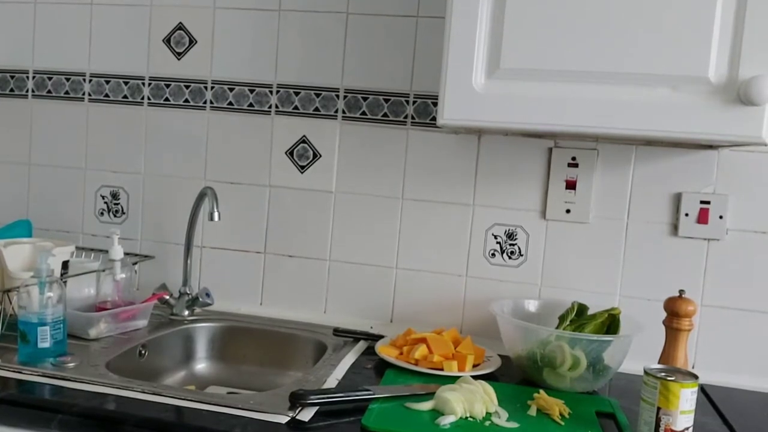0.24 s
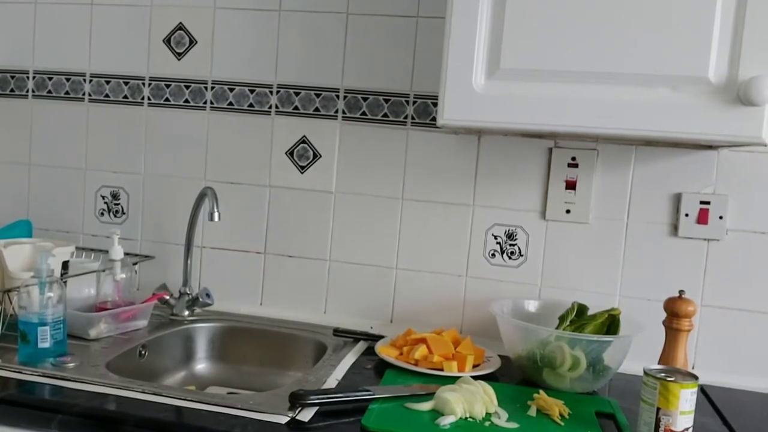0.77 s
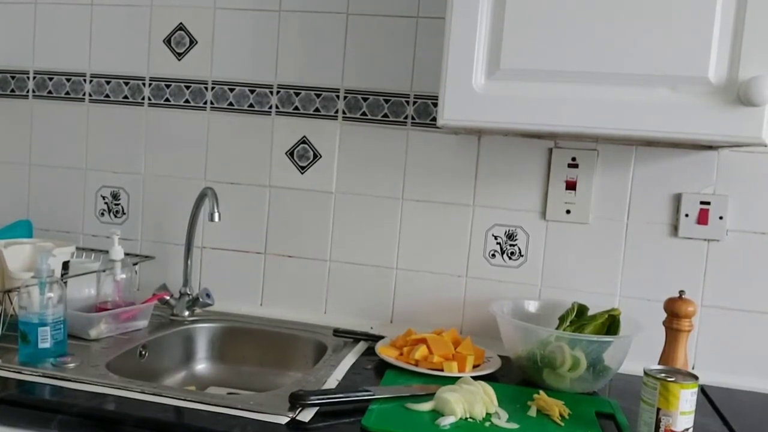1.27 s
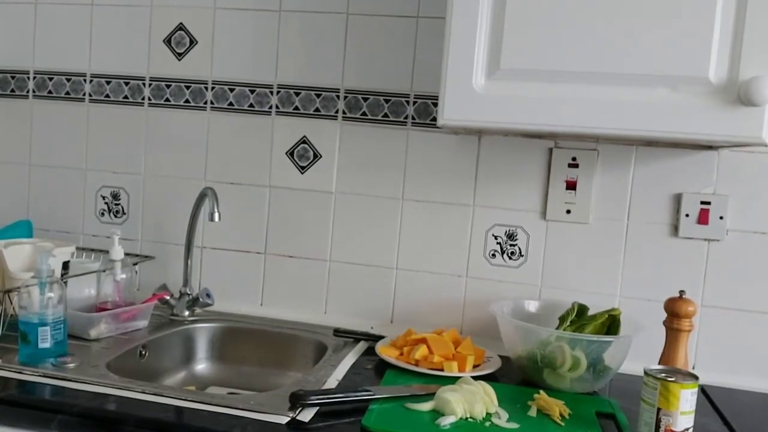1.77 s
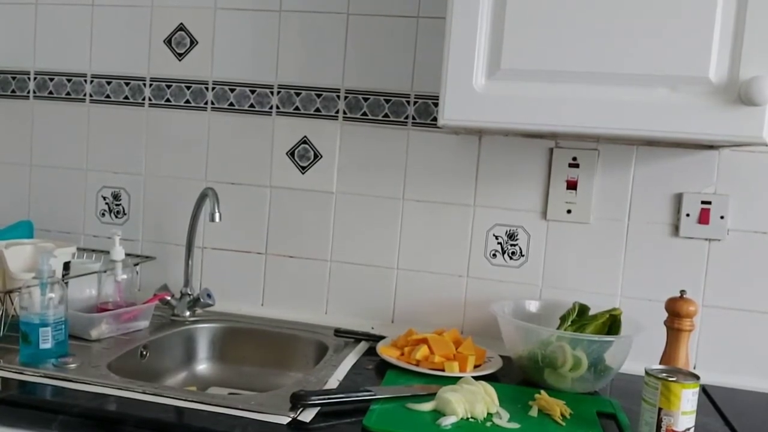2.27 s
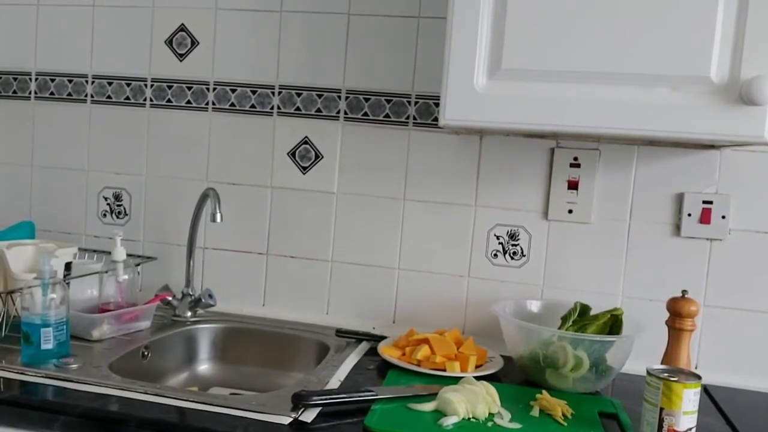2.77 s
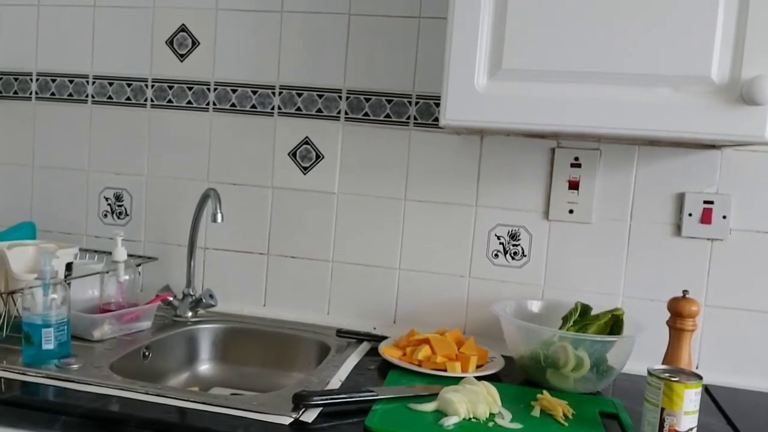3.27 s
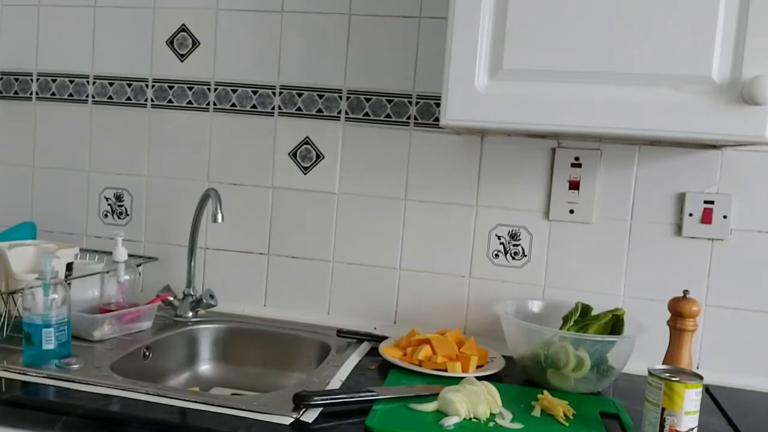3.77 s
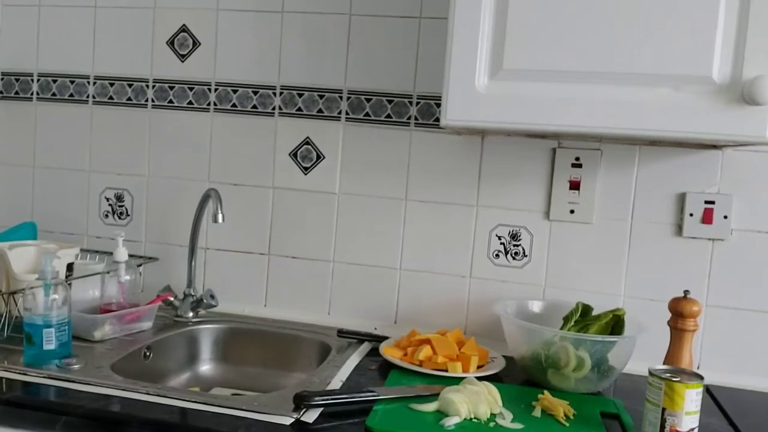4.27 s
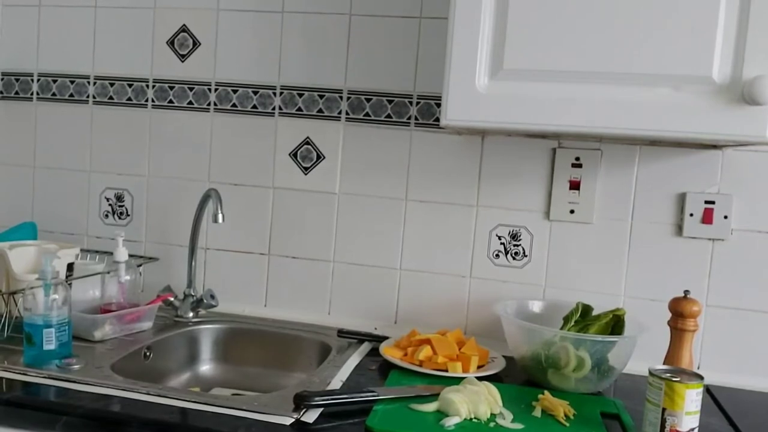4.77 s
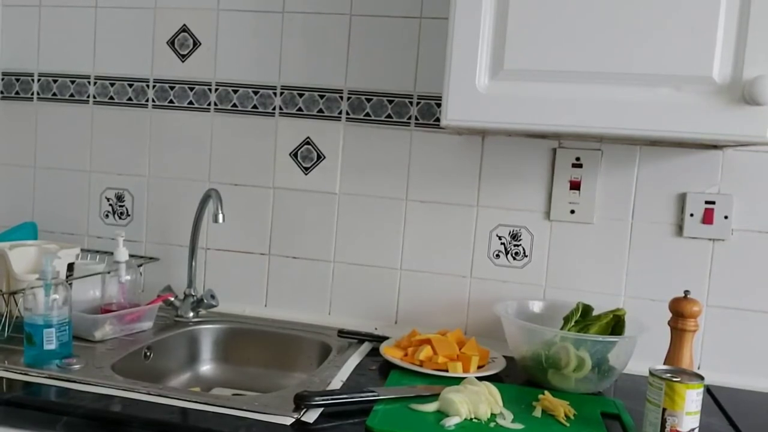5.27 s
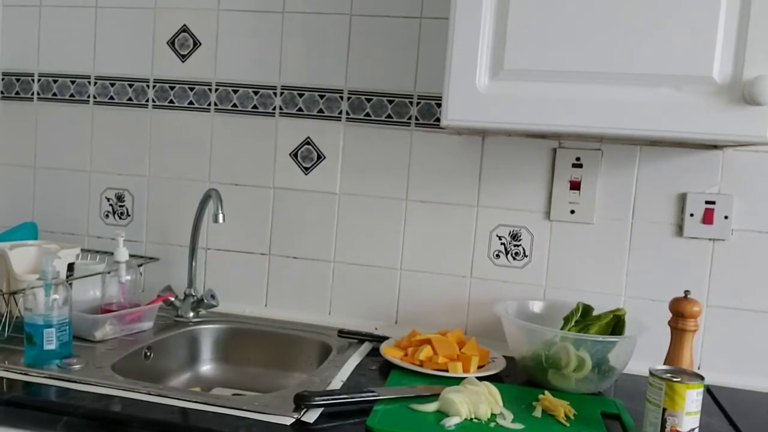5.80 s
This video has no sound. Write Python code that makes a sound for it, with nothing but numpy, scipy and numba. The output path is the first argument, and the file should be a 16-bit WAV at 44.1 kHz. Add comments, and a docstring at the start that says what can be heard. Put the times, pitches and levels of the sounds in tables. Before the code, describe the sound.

Dry rice is scooped and tipped into a metal pot in three short hissing pours, after a container thuds in a kitchen.

```python
"""Rice shifts in a container that is set down with hollow thuds, and a utensil clacks, in a tiled kitchen.
Three times a cup crunches into the dry rice and tips its load into a cooking pot: a rush of tiny
impacts rings the metal and thins to a hiss of grain on grain, while the hollow air note of the cup
sinks as it empties. Two closely spaced microphones listen from a metre away."""
import sys
import numpy as np
from scipy import signal
from scipy.fft import rfft, irfft
from scipy.io import wavfile
from scipy.ndimage import uniform_filter1d
from numba import njit

SR = 44100
rng = np.random.default_rng(int(sys.argv[2]) if len(sys.argv) > 2 else 0)


def master_out(mix):
    """Clip the mix to full scale and print it as 16-bit PCM to the path in sys.argv[1]."""
    frames = np.transpose(np.atleast_2d(mix))
    ceiling = np.clip(frames, -1, 1)
    pcm = np.round(ceiling * 32767).astype(np.int16)
    wavfile.write(sys.argv[1], SR, pcm)


N = 266364
TIME_S = np.arange(N) / SR
FREQ_HZ = np.fft.rfftfreq(N, 1 / SR)
MIC_LAG_S = .00039


def undb(db):
    """Decibels to gain."""
    return 10 ** (np.asarray(db) / 20)


def unit(x):
    """Scale to rms 1."""
    return x / np.sqrt(np.mean(x ** 2))


def colour(points):
    """Gain at every frequency from (Hz, dB) points."""
    hz, db = np.transpose(points)
    return undb(np.interp(np.log(FREQ_HZ + 1), np.log(hz), db))


def resonances(modes):
    """Summed response of (Hz, width in Hz, dB) resonances."""
    return sum(undb(db) / (1 + 2j * (FREQ_HZ - hz) / width_hz) for hz, width_hz, db in modes)


def envelope(start_s, rise_s, hold_s, t60_s):
    """Gain that swells, half up at its start, holds, then dies away."""
    age_s = TIME_S - start_s
    return .5 * (1 + np.tanh(.5 * age_s / rise_s)) * undb(-60 * np.maximum(age_s - hold_s, 0) / t60_s)


def wander(rate_hz):
    """Ramps between random levels; spread near 1."""
    step = max(2, int(SR / rate_hz))
    return 1.2 * uniform_filter1d(np.repeat(rng.standard_normal(N // step + 1), step), step)[:N]


def diffuse(response=1, alike_hz=520):
    """Noise from all sides, rms 1: left and right share the bass but not the treble."""
    mid, side = rng.standard_normal((2, 2 * len(FREQ_HZ))).view(complex)
    likeness = .94 / (1 + (FREQ_HZ / alike_hz) ** 4)
    mid, side = mid * np.sqrt(1 + likeness), side * np.sqrt(1 - likeness)
    return unit(irfft(np.array([mid + side, mid - side]) * response, N))


def kitchen(walls_db=7, early_t60_s=0.022, late_t60_s=0.95, late_db=-23):
    """Room response: direct sound, left first, then reflections off the tiles and a late tail."""
    t = TIME_S[:SR]
    decay = undb(-60 * t / early_t60_s) + undb(late_db - 60 * t / late_t60_s)
    path = undb(walls_db) * unit(rng.standard_normal((2, SR)) * decay) / np.sqrt(SR)
    path[[0, 1], [0, round(MIC_LAG_S * SR)]] += 1
    return rfft(path, N)


def grains(gain, spectrum, peak_per_s, spread_db, wash_db):
    """Random impacts, denser with more flow, over a wash of countless tiny contacts."""
    chance = np.clip(peak_per_s * (gain / gain.max()) ** .4 / SR, 1e-3, 1)
    size = undb(spread_db * np.minimum(rng.exponential(size=N), 6)) * rng.choice([-1, 1], N)
    impacts = unit((rng.random(N) < chance) * size / np.sqrt(chance))
    pad = 256
    tick = np.roll(irfft(kitchen() * spectrum, N), pad, axis=1)[:, :SR]
    tick /= np.sqrt(np.sum(tick ** 2) / 2)
    ticks = signal.fftconvolve([impacts * gain], tick)[:, pad:pad + N]
    wash = undb(wash_db) * gain * diffuse(spectrum)
    return (ticks + wash) / np.hypot(1, undb(wash_db))


# Room tone spectrum. Each row: frequency in Hz, level in dB.
ROOM_SPECTRUM = [(20, -26.5), (60, -11), (150, -5), (400, -11), (1000, -9), (1500, -24), (6000, -14.5),
                 (15000, -19.5)]

def room_tone(level_db=-71.5):
    """Faint steady noise of the kitchen."""
    return undb(level_db) * diffuse(colour(ROOM_SPECTRUM))


# Spectra of rice moving in the container. Each row: frequency in Hz, level in dB.
TRICKLE_SPECTRUM = [(2000, -22.5), (5000, -9.5), (8000, -7.5), (11000, -5), (13500, -9), (16000, -14.5)]
CRUNCH_SPECTRUM = [(200, -17), (600, -1), (1000, 5.5), (1500, 1.5), (2200, 3), (3200, 1), (5000, -1.5),
                   (7000, -7), (12000, -11.5), (16000, -31)]
RUMBLE_SPECTRUM = [(40, -31.5), (100, -16.5), (180, -7.5), (380, 3), (650, 2), (1000, -9), (2000, -20),
                   (5000, -52)]
# Shifts of the rice. Each row: start, rise and hold in seconds, level in dB.
RICE_SHIFTS = [(.015, .01, 1.05, -55), (.15, 0.023, 0.049, -52), (.41, .01, .1, -57.5)]

def shifts(crunch_db=-4, rumble_db=5, t60_s=1.0):
    """Rice slides softly inside the moving container."""
    gain = np.sqrt(sum((undb(db) * envelope(*timing, t60_s)) ** 2 for *timing, db in RICE_SHIFTS))
    spectrum = colour(TRICKLE_SPECTRUM) + undb(crunch_db) * colour(CRUNCH_SPECTRUM)
    spectrum += undb(rumble_db) * colour(RUMBLE_SPECTRUM)
    return grains(gain, spectrum, peak_per_s=12000, spread_db=4, wash_db=5.5)


# Spectra of falling rice, on rice and on the pot. Each row: frequency in Hz, level in dB.
HISS_SPECTRUM = [(2000, -42), (5000, -25), (6700, -10.5), (7800, -4.5), (11000, 1.5), (13500, -1),
                 (15500, -3.5), (16500, -11)]
IMPACT_SPECTRUM = [(60, -19), (250, -18), (450, -6.5), (900, 1.5), (1400, -1), (2200, -2), (4500, -0.5),
                   (7000, -1), (10000, -15.5), (16000, -13.5)]
# Small spills. Each row: start in seconds, level in dB, t60 in seconds.
RICE_SPILLS = [(0.096, -51.5, 1.2), (2.329, -59.5, 0.56), (2.408, -64.5, 1.2), (2.453, -39.5, .7),
               (5.405, -60, 0.82), (5.6, -68.5, 1)]

def spills(impact_db=-25):
    """A few grains drop at once and scatter."""
    gain = sum((TIME_S >= start_s) * undb(db - 60 * abs(TIME_S - start_s) / t60_s)
               for start_s, db, t60_s in RICE_SPILLS)
    spectrum = colour(HISS_SPECTRUM) + undb(impact_db) * colour(IMPACT_SPECTRUM)
    return grains(gain, spectrum, peak_per_s=6000, spread_db=2, wash_db=1)


# Resonances of the container, sounded by the scraping cup. Each row: frequency and half-width in Hz, level in
# dB.
RIM_MODES = [(387.2, 4.5, 6.5), (500, 13, -6.5), (960, 70, -4.5), (2150, 130, -11), (2330, 160, -10)]
# Scrapes along the container. Each row: start, rise and hold in seconds, level in dB.
RIM_SCRAPES = [(1.804, .02, 0.27, -60.5), (2.17, .012, 0.088, -67)]

def scrapes(t60_s=.7):
    """Friction at the rim makes the container sing faintly."""
    # Squared, so the valleys between resonances stay dark.
    song = sum(undb(db) * abs(resonances([(hz, 2 * half_hz, 0)])) ** 2 for hz, half_hz, db in RIM_MODES)
    gain = np.sqrt(sum((undb(db) * envelope(*timing, t60_s)) ** 2 for *timing, db in RIM_SCRAPES))
    return gain * diffuse(song)


# Resonances of container and cup while digging. Each row: frequency and width in Hz, level in dB.
SCOOP_MODES = [(184, 5.3, 3.5), (309, 14, 0), (423.5, 14, 3), (505, 4.9, 6.5), (810, 26, 1), (910, 29, 7.5)]
# Cup strokes. Each row: start, rise and hold in seconds, level in dB, depth as rumble gain in dB.
SCOOP_STROKES = [(1.359, 0.025, 0.19, -52.5, 3.5), (1.5, .008, 0.033, -54.5, -2.5),
                 (1.626, .008, 0.021, -51.5, -0.5), (1.746, 0.02, 0.14, -52.5, -7.5),
                 (1.943, 0.013, 0.087, -61.5, 1), (2.983, .006, 0.018, -51, -8),
                 (3.056, 0.0205, 0.081, -45.5, 1), (3.338, 0.0212, 0.16, -59, -8.5),
                 (3.54, 0.0096, 0.025, -66, -16.5), (3.704, .01, 0.048, -78, -23.5),
                 (3.8, 0.0094, 0.024, -77.5, -21.5), (4.608, 0.0083, 0.077, -46.5, -2),
                 (4.706, .012, 0.036, -39.5, -1), (4.74, 0.0054, 0.012, -44, 5),
                 (4.954, 0.041, 0.031, -56, -15), (5.048, 0.015, .05, -54, -5.5),
                 (5.178, 0.0056, 0.053, -61.5, -4.5), (5.45, 0.0084, .08, -79.5, -8)]

def scoops(crunch_db=1.5, trickle_db=1, slip_db=0.75, body_db=9, settle_t60_s=.56, trickle_per_depth=.7):
    """The cup digs in small slips; deep strokes shake the container, shallow ones let grains trickle."""
    power = np.array([(undb(db) * envelope(*timing, settle_t60_s)) ** 2
                      for *timing, db, _ in SCOOP_STROKES])
    depth_db = np.array(SCOOP_STROKES)[:, -1]
    slips = undb(slip_db * wander(rate_hz=70))
    crunch_gain = np.sqrt(power.sum(axis=0)) * slips
    rumble_gain = np.sqrt(undb(depth_db) ** 2 @ power) * slips
    trickle_gain = np.sqrt(undb(-trickle_per_depth * depth_db) ** 2 @ power)
    body = colour(RUMBLE_SPECTRUM) * np.hypot(1, undb(body_db) * abs(resonances(SCOOP_MODES)))
    crunch = grains(crunch_gain, colour(CRUNCH_SPECTRUM), peak_per_s=1500, spread_db=.5, wash_db=3.5)
    rumble = rumble_gain * diffuse(body)
    trickle = grains(trickle_gain, colour(TRICKLE_SPECTRUM), peak_per_s=4900, spread_db=3, wash_db=4.5)
    return undb(crunch_db) * crunch + rumble + undb(trickle_db) * trickle


def knocks(blows, modes, spectrum, body_t60_s, room_t60_s, room_db, pivot_hz=600):
    """Each blow rings a few clear modes over a dense, short clatter; a softer contact is duller."""
    out = np.zeros((2, N + SR))
    t, freq_hz = TIME_S[:SR], np.fft.rfftfreq(SR, 1 / SR)
    response = np.interp(freq_hz, FREQ_HZ, colour(spectrum))
    octaves = np.log2(np.maximum(freq_hz / pivot_hz, .5))
    noise = diffuse()
    mic_time_s = t - np.array([[0], [MIC_LAG_S]])
    ring = sum(undb(db - 60 * t / t60_s) * np.sin(2 * np.pi * hz * mic_time_s) for hz, db, t60_s in modes)
    ring /= np.sqrt(sum(undb(db) ** 2 for _, db, _ in modes) / 2)
    decay = undb(-60 * t / body_t60_s) + undb(room_db - 60 * t / room_t60_s)
    fade = np.minimum(1, 2 * (1 - t)) ** 2
    for start_s, db, tilt_db_per_oct, ring_db, rise_s in blows:
        tilt = undb(tilt_db_per_oct * octaves)
        burst = np.roll(noise, rng.integers(N), axis=1)[:, :SR]
        clatter = unit(irfft(rfft(burst) * response * tilt, SR)) * decay
        ringing = undb(ring_db) * irfft(rfft(ring) * tilt, SR)
        attack = 1 - np.exp(-(t / rise_s) ** 2)
        start = int(start_s * SR)
        out[:, start:start + SR] += undb(db) * (clatter + ringing) * attack * fade
    return out[:, :N]


# Utensil clatter spectrum. Each row: frequency in Hz, level in dB.
CLACK_SPECTRUM = [(40, -17), (190, -8), (240, -7), (350, -4), (700, -4.5), (1500, -14.5), (2000, -14.5),
                  (3200, -22.5), (4100, -13), (5000, -28.5), (9000, -23), (16000, -36)]
# Utensil modes. Each row: frequency in Hz, level in dB, t60 in seconds.
CLACK_MODES = [(237, 0, 0.4), (365, -0.5, 0.49), (654, 11, 0.29), (687, 0, 0.19), (1820, -5, 0.33),
               (1915, 5, 0.39), (2073, -6, 0.27), (2560, -9, 0.35), (2676, -11.5, 0.39), (4180, -8, 0.33),
               (4285, -16, 0.27), (5200, -2, 0.12), (5480, -12, .35), (5879, -10.5, 0.41)]
# Blows. Each row: start in seconds, level in dB, tilt in dB per octave, ring in dB, rise in seconds.
CLACK_BLOWS = [(.874, -32, 0.85, -1, 0.0028), (.89, -30.5, -0.67, 0, 0.0047)]

def clack():
    """A hard utensil strikes and rebounds."""
    return knocks(CLACK_BLOWS, CLACK_MODES, CLACK_SPECTRUM, body_t60_s=.36, room_t60_s=.35, room_db=-6.5)


# Container clatter spectrum. Each row: frequency in Hz, level in dB.
THUD_SPECTRUM = [(25, -47), (70, -11.5), (200, -9.5), (400, -1), (600, -4), (850, -6), (1800, -5.5),
                 (2500, -17.5), (3500, -30), (6000, -43), (16000, -54)]
# Container modes. Each row: frequency in Hz, level in dB, t60 in seconds.
THUD_MODES = [(73, -10.5, 0.35), (133.5, -6, 0.25), (326.1, 3.5, 0.27), (416.4, -5.5, .22),
              (501.6, 3.5, 0.29), (536, 3, 0.37), (675, -1.5, 0.43), (628, -6, 0.3), (723, -13, 0.63),
              (940, -11, 0.27), (1020, -10, 0.34), (1261, -8.5, .4), (1710, -12.5, 0.27), (1782, -17, .2),
              (1910, -19, .4), (2385, -22.5, 0.65)]
# Blows. Each row: start in seconds, level in dB, tilt in dB per octave, ring in dB, rise in seconds.
THUD_BLOWS = [(.2, -34.5, 6.5, 3, 0.0028), (.21, -13.5, 0.5, 3.5, 0.0097), (.406, -20.5, 0.24, 5, 0.0062),
              (.487, -26.5, -1, 6.5, 0.013), (.569, -36, -3.5, 0.5, 0.003), (.695, -45.5, -4.5, 0, 0.0048),
              (.742, -38, -8.5, -18, 0.0074), (.835, -50, -6, 9, 0.012), (1.055, -54, -7, 3, 0.0044),
              (1.2, -58, -2, 0, 0.022), (1.4, -52, 1, 15, 0.06), (1.645, -47.5, -0.5, 1, 0.0071),
              (1.762, -51, -10.5, -21, 0.01), (2.5, -51, -4, -2, 0.0085), (2.81, -47, -0.5, -18, 0.02),
              (3.075, -56.5, -4.5, 8, 0.033), (3.34, -60.5, 0.5, 4, 0.021), (4.438, -44.5, 1, -13, 0.0067),
              (4.55, -50.5, 2.5, -4, 0.017), (4.975, -59.5, -7, -14.5, .006),
              (5.982, -42, -3.5, -4.5, 0.013)]

def thuds():
    """The hollow container is set down, then lightly knocked."""
    return knocks(THUD_BLOWS, THUD_MODES, THUD_SPECTRUM, body_t60_s=.31, room_t60_s=.4, room_db=-8.5)


def cup_note(flow, age_s, full_hz, empty_hz=450, width_hz=171.0, sink_s=.073, open_s=.044, fade_s=.31):
    """The stream rattles the air in the cup; the note swells as the mouth clears, sinks and fades."""
    note_hz = empty_hz + (full_hz - empty_hz) * np.exp(-age_s / sink_s)
    air = np.array([moving_band(moving_band(x, note_hz, width_hz), note_hz, width_hz) for x in diffuse()])
    opening = 1 - np.exp(-age_s / open_s)
    fade = np.exp(-(age_s / fade_s) ** 2)
    return flow * opening * fade * unit(air)


@njit
def moving_band(x, centre_hz, width_hz):
    """State-variable band-pass whose centre moves."""
    out, band_state, low_state = np.empty(len(x)), 0., 0.
    for i in range(len(x)):
        g, damping = np.tan(np.pi * centre_hz[i] / SR), width_hz / centre_hz[i]
        band = (band_state + g * (x[i] - low_state)) / (1 + g * (g + damping))
        band_state = 2 * band - band_state
        low_state += 2 * g * band
        out[i] = damping * band
    return out


# Pot resonances. Each row: frequency and width in Hz, level in dB.
POT_RESONANCES = [(2970, 98, 0.5), (3420, 59, -4), (3900, 35, 1.5), (4020, 60, -5), (4545, 30, 1),
                  (5360, 110, -0.5), (5800, 46, -3), (6630, 75, -1.5), (7238, 40, 0)]

def pot_strikes(flow, age_s, ring_db, cover_s=.16, tilt_db_per_oct=.7, pivot_hz=3500):
    """Grains ring the bright, bare metal until a bed of rice covers and damps it."""
    strike = colour(IMPACT_SPECTRUM)
    bare = np.exp(-(age_s / cover_s) ** 2)
    tilt = undb(tilt_db_per_oct * np.log2((FREQ_HZ + 1) / pivot_hz))
    # Just below each resonance the wall cancels the direct tick.
    ringing = strike * tilt * (1 + 1j * undb(ring_db) * resonances(POT_RESONANCES))
    on_metal = grains(flow * bare, ringing, peak_per_s=2500, spread_db=1.5, wash_db=-14.5)
    on_rice = grains(flow * np.sqrt(1 - bare ** 2), strike, peak_per_s=2200, spread_db=1.5, wash_db=-12)
    return on_metal + on_rice


# The rest of each load sliding out. Each row: start, rise, hold and t60 in seconds, hiss in dB.
LATE_SURGES = [(2.855, 0.0034, .018, 0.15, -37.5), (4.275, 0.0083, 0.051, 0.21, -29.5),
               (5.816, 0.013, 0.045, 0.66, -25.5)]
# Cup loads. Each row: landing, rise, hold and t60 in seconds; strikes, hiss, pot ring and cup note
# in dB; note of the full cup in Hz.
CUP_LOADS = [(2.506, 0.0043, .02, 0.67, -24.5, -12.5, 7.5, -4.5, 700),
             (4.166, .007, 0.065, 0.56, -34, -24, -18.5, -1.5, 570),
             (5.709, .008, 0.1, 0.75, -45.5, -42, -16.5, -1, 503)]

def pours(impact_db=1.5, hiss_db=-.8, clump_db=1, empty_after_s=.42, empty_t60_s=.26,
          lead_db=-53.5, lead_db_per_s=186, lead_impact_db=-13):
    """Each load strikes the pot, sounds the cup and skitters over the rice already there."""
    clumps = undb(clump_db * wander(rate_hz=110))
    hiss_gain = sum(undb(db) * envelope(*timing) for *timing, db in LATE_SURGES)
    out = np.zeros((2, N))
    for land_s, rise_s, hold_s, t60_s, strike_db, skitter_db, ring_db, cup_db, full_hz in CUP_LOADS:
        age_s = np.maximum(TIME_S - land_s, 0)
        run_out = undb(-60 * np.maximum(age_s - empty_after_s, 0) / empty_t60_s)
        stream = envelope(land_s, rise_s, hold_s, t60_s) * run_out
        lead = undb(lead_db - lead_db_per_s * abs(TIME_S - land_s))  # grains slip as the cup tilts
        flow = (undb(strike_db) * stream + undb(lead_impact_db) * lead) * clumps
        out += undb(impact_db) * pot_strikes(flow, age_s, ring_db)
        out += undb(cup_db) * cup_note(flow, age_s, full_hz)
        hiss_gain += undb(skitter_db) * stream + lead
    hiss = grains(hiss_gain * clumps, colour(HISS_SPECTRUM), peak_per_s=7000, spread_db=-1.5, wash_db=7)
    return out + undb(hiss_db) * hiss


def scene():
    """Knocks, scoops and pours over the quiet of the kitchen."""
    handling = thuds() + clack()
    rice = pours() + scoops() + scrapes() + shifts() + spills()
    lean_left = undb([[.2], [-.2]])
    return handling + rice * lean_left + room_tone()


def record(dry, top_hz=15900):
    """A steep low-pass cuts the highest treble."""
    return signal.sosfilt(signal.ellip(10, .2, 80, top_hz, fs=SR, output="sos"), dry)


dry = scene()
out = record(dry)
master_out(out)
```